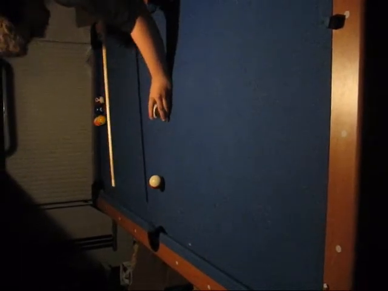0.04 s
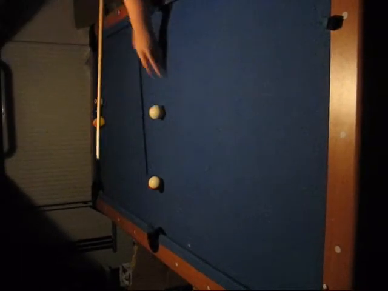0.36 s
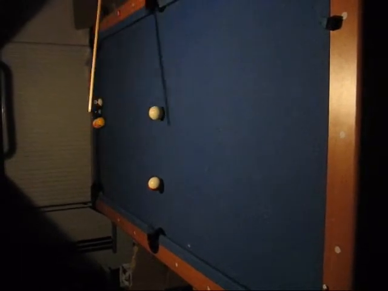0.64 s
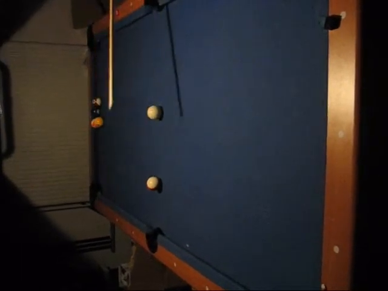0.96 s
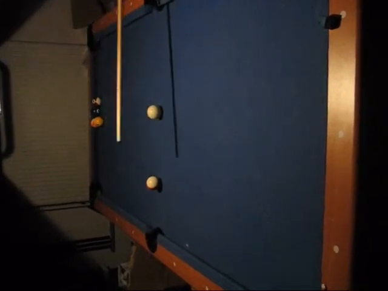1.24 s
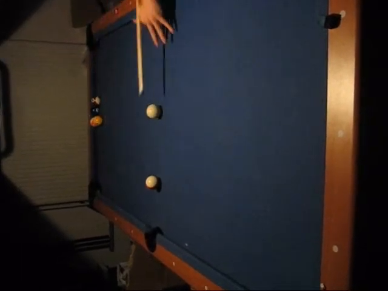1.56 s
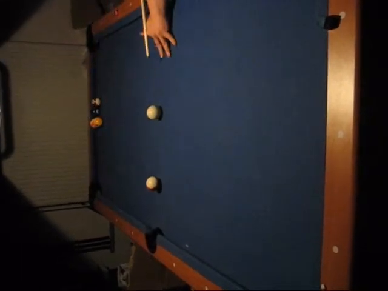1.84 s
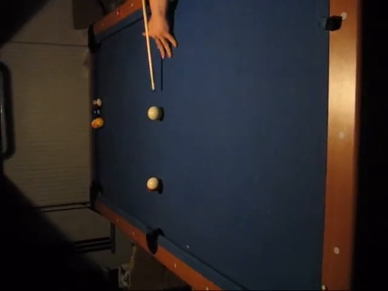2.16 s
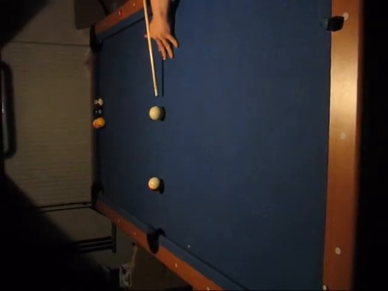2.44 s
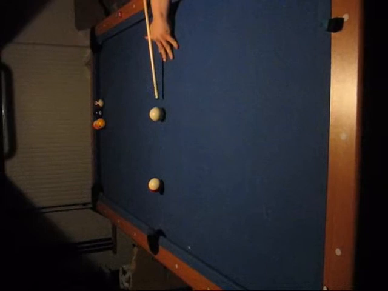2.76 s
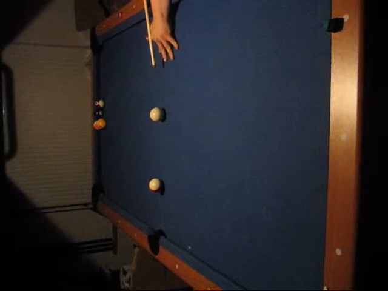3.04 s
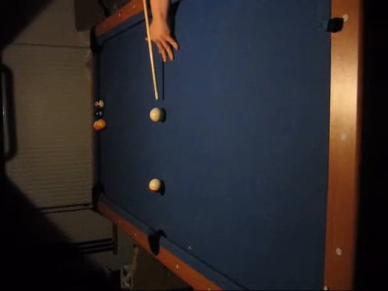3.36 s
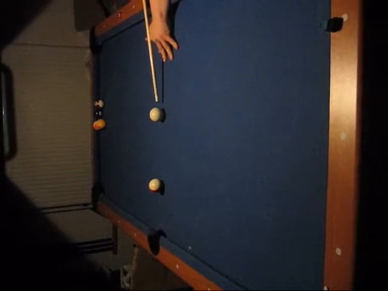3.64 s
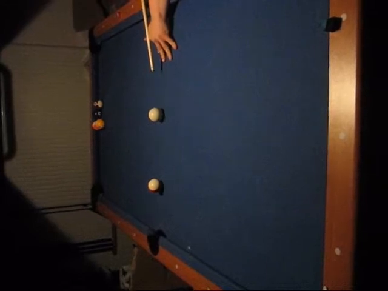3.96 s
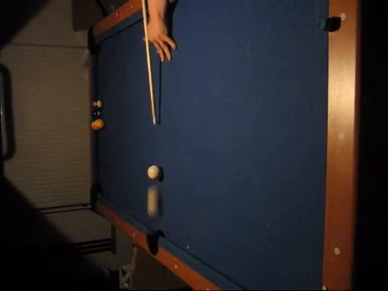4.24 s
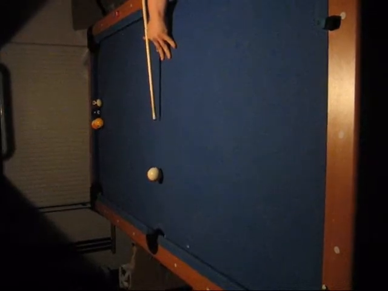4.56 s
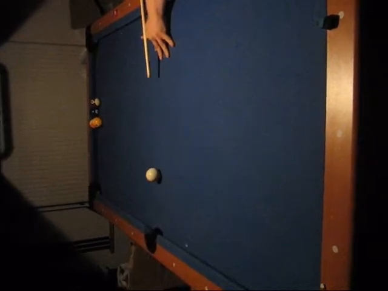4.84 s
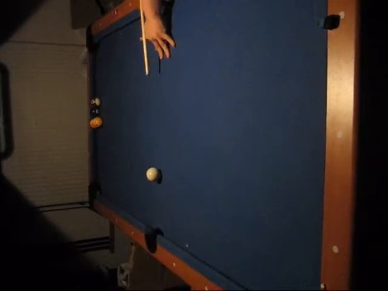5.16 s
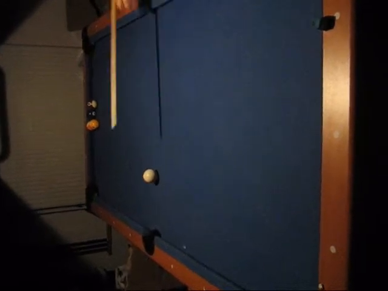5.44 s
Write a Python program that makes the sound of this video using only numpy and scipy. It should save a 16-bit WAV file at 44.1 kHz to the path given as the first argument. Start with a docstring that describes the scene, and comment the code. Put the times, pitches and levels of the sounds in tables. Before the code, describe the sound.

A pool cue taps a ball that clicks another into a pocket, where it drops and rolls away through wood, over steady hiss.

```python
"""Pool shot in a small hard room

Sleeve and cue shaft rustle, the leather tip strikes, and the cue ball clicks on a second ball,
which hits the pocket, drops into the wooden return channel and rolls away inside the table.
A small camera overhead ducks its gain at the blows and adds hiss, whine and coarse 8-bit grit."""
import sys
import numpy as np
from scipy import signal
from scipy.fft import rfft, irfft, next_fast_len
from scipy.io import wavfile
from scipy.ndimage import map_coordinates

SR = 44100
rng = np.random.default_rng(int(sys.argv[2]) if len(sys.argv) > 2 else 0)


def wav_out(sig):
    """Save sig, one row per channel (or a flat mono array), as 16-bit PCM at SR to the path in sys.argv[1]."""
    wavfile.write(sys.argv[1], SR, np.round(np.clip(np.atleast_2d(sig).T, -1, 1) * 32767).astype(np.int16))


N = 242991
TIME = np.arange(N) / SR

# the tip's double contact: start_s, level_db, corner_hz, room_db
TIP_HITS = [(4.2291, -9.5, 2430, -3), (4.2303, -9.5, 6060, -1)]
# colour of the tap: freq_hz, gain_db
TIP_COLOUR = [(40, -18.5), (120, -17.5), (230, 5.5), (500, 5), (700, -17.5), (1100, -5), (1700, -9),
              (2400, -5.5), (3200, -24), (5000, -33.5)]
# ring of the cue: pitch_hz, level_db, t60_s
CUE_RING = [(243, -11, 0.21), (297, -3, 0.04), (344, -11, 0.046), (482, -1.5, 0.14), (980, -17.5, .2),
            (1440, -30, 0.15), (2094, -12.5, 0.1), (2230, -24, 0.088)]

def cue_strike():
    """The leather tip taps the cue ball and sets the cue ringing."""
    return blows(TIP_HITS, body(TIP_COLOUR, CUE_RING, ring_db=-4), near_db=2)

# cue ball on the second ball, then that ball on the pocket's edge: start_s, level_db, corner_hz, room_db
CLICK_HITS = [(4.2996, -3.5, 3750, -3), (4.3853, -13, 7100, -12)]
# colour of a click: freq_hz, gain_db
CLICK_COLOUR = [(100, -18.5), (400, -24.5), (800, -16), (1200, -9.5), (1850, -0.5), (2800, -1),
                (3500, -8.5), (4500, -18.5), (5500, -26)]

def hard_clicks(slate_delay_s=0.0013, slate_gain=0.21):
    """The collision and the pocket-edge tick: bright pulses, each with a reflection from the slate."""
    clicks = blows(CLICK_HITS, body(CLICK_COLOUR), near_db=0)
    return clicks + slate_gain * np.interp(TIME - slate_delay_s, TIME, clicks, left=0)

# ever duller hits in the pocket: start_s, level_db, corner_hz, room_db
POCKET_HITS = [(4.3858, -11, 4960, -9.5), (4.391, -3.5, 2020, -7), (4.395, -5, 1450, -9.5),
               (4.4055, -10, 930, -11.5)]
# colour of the clunk: freq_hz, gain_db
POCKET_COLOUR = [(60, -20.5), (140, -21), (220, -3), (480, -6.5), (700, -15.5), (1400, -7), (2200, -14.5),
                 (4000, -22.5)]
# ring of the pocket: pitch_hz, level_db, t60_s
POCKET_RING = [(219, -12, 0.16), (314, 0.5, 0.12), (470, -19.5, 0.069), (902, -10, 0.062),
               (1366, -18.5, 0.069)]

def pocket_clunk():
    """The ball hits the pocket's back wall, which rings low and short."""
    return blows(POCKET_HITS, body(POCKET_COLOUR, POCKET_RING, ring_db=6), near_db=2.5)

# the drop and its bounces: start_s, thud_db, thud_corner_hz, rattle_db, gap_s, rattle_corner_hz
CHANNEL_LANDINGS = [(4.4497, -10, 520, -12, .0088, 7100), (4.7285, -22, 400, -20, .0105, 3930),
                    (4.8734, -14, 854, -18.5, .0205, 2670)]
# knocks on corners and joints: start_s, level_db, corner_hz
CHANNEL_KNOCKS = [(4.486, -11.5, 1080), (4.4904, -13, 1190), (4.4973, -13, 800), (4.5409, -20, 2200),
                  (4.5557, -18.5, 2160), (4.977, -24, 690), (4.997, -26.5, 1210), (5.048, -23.5, 1010),
                  (5.1438, -34.5, 2980), (5.205, -30, 261)]

def channel_knocks(cabinet, rattles=3, loss_db=3.5):
    """Each landing thuds, then rattles and fades between the side walls; single knocks follow."""
    knock_room_db, thud_room_db, rattle_room_db = -6.5, -2.5, -1
    hits = [(start_s, db, corner_hz, knock_room_db) for start_s, db, corner_hz in CHANNEL_KNOCKS]
    for start_s, thud_db, thud_hz, rattle_db, gap_s, rattle_hz in CHANNEL_LANDINGS:
        hits.append((start_s, thud_db, thud_hz, thud_room_db))
        for k in range(rattles):
            hits.append((start_s + (k + 1) * gap_s, rattle_db - k * loss_db, rattle_hz, rattle_room_db))
    return blows(hits, cabinet, near_db=5)  # hidden inside the table: little arrives directly

# stretches of rolling on wood: start_s, length_s, level_db
ROLL_RUNS = [(4.534, .055, -31.5), (4.742, .04, -31), (4.891, .285, -28)]

def roll_envelope(attack_s=0.028, fade_db_per_s=3, stop_db_per_s=201, creep_db=-45.5):
    """Each run builds, loses a little speed and dies; after the last the ball creeps on."""
    runs = np.zeros(N)
    for start_s, length_s, db in ROLL_RUNS:
        age = np.maximum(TIME - start_s, 0)
        loss_db = fade_db_per_s * age + stop_db_per_s * np.maximum(age - length_s, 0)
        runs += np.minimum(age / attack_s, 1) * amp(db - loss_db)
    return np.maximum(runs, amp(creep_db) * (TIME > ROLL_RUNS[-1][0]))

def rolling(cabinet, bumps_per_s=75, uneven=0.12, scatter_db=3, scrape_db=6.5, fade_db_per_s=23.5):
    """Uneven bumps and fine scraping drive the cabinet; the scrape fades as the ball runs deeper."""
    bump_count = np.cumsum(bumps_per_s * np.exp(uneven * wobble(60))) / SR
    bumps = np.diff(np.floor(bump_count), prepend=0) * amp(scatter_db * wobble(80))
    chatter = unit(softened(bumps - bumps.mean(), corner_hz=260))
    away_s = np.maximum(TIME - ROLL_RUNS[-1][0], 0)
    scrape = amp(scrape_db - fade_db_per_s * away_s) * rng.standard_normal(N)
    rumble = roll_envelope() * unit(signal.fftconvolve(chatter + scrape, cabinet)[:N])
    return signal.fftconvolve(rumble, room(room_db=-10.5, near_db=-4.5))[:N]

# colour of a tap on the wood: freq_hz, gain_db
CABINET_COLOUR = [(40, -35), (80, -22.5), (140, -11.5), (200, 1), (520, -2), (800, -3), (1100, -5),
                  (1900, -7.5), (2900, -13), (4000, -25), (5500, -24.5)]
# boom of the cabinet: pitch_hz, level_db, t60_s
CABINET_RING = [(86.2, -17.5, .24), (113, -10.5, 0.24), (192, -5, 0.17), (228, -2.5, .18),
                (320, -1.5, 0.093), (502, -3.5, .08), (668, -6.5, 0.058), (958, -6, 0.078)]

def return_channel():
    """Knocks and rolling both sound through the table's wooden cabinet."""
    cabinet = body(CABINET_COLOUR, CABINET_RING, ring_db=-5.5)
    return channel_knocks(cabinet) + rolling(cabinet)

def body(colour, modes=(), ring_db=0, size=16384):
    """An object's answer to a tap: a short minimum-phase pulse plus its ringing modes."""
    cepstrum = irfft(np.log(amp(along(colour, np.fft.rfftfreq(size, 1 / SR)))))
    cepstrum[1:size // 2] *= 2
    cepstrum[size // 2 + 1:] = 0
    pulse = irfft(np.exp(rfft(cepstrum)))
    t = np.arange(size) / SR
    ring = sum(amp(db) * decay(t, t60_s) * np.cos(2 * np.pi * hz * t) for hz, db, t60_s in modes)
    return unit(pulse) + amp(ring_db) * unit(ring)

def softened(x, corner_hz):
    """A longer, softer contact loses the treble."""
    return signal.sosfilt(signal.butter(2, corner_hz, fs=SR, output="sos"), x)

def blows(hits, response, near_db):
    """Each blow excites the object, then the room; its level is the dry energy spread over 10 ms."""
    out = np.zeros(N + 2 * SR)
    for start_s, db, corner_hz, room_db in hits:
        hit = softened(response, corner_hz)
        hit *= amp(db) * np.sqrt(SR / 100) / np.linalg.norm(hit)
        heard = signal.fftconvolve(hit, room(room_db, near_db))
        out[round(start_s * SR):][:len(heard)] += heard
    return out[:N]

# the player's movements: peak_s, rise_s, sleeve_db, shaft_db
MOVES = [(.18, 0.083, -52, -56), (.345, 0.066, -45, -45.5), (0.763, .045, -46, -42.5),
         (.96, 0.021, -67, -50.5), (1.066, 0.039, -46.5, -37), (1.285, 0.033, -57.5, -48.5),
         (1.555, .06, -41.5, -42), (1.691, 0.025, -47.5, -55), (1.8, 0.27, -54.5, -56),
         (5.335, 0.031, -43.5, -48), (5.4, 0.048, -44.5, -54.5), (5.5, .025, -41, -46.5)]
# soft rustle of the sleeve: freq_hz, density_db
SLEEVE_COLOUR = [(100, -17), (250, -3.5), (450, 0), (900, -1), (1400, -9.5), (2500, -23.5)]
# the shaft sliding through the hand: freq_hz, density_db
SHAFT_COLOUR = [(600, -28), (1000, -9), (1500, 1.5), (2600, 0), (3500, -5), (5000, -16)]

def handling(grain_db=1.57):
    """Cloth and skin catch and slip as the player lines up and later stands back."""
    speeds = np.array([stroke(peak_s, rise_s) for peak_s, rise_s, _, _ in MOVES])
    _, _, sleeve_db, shaft_db = np.transpose(MOVES)
    catch = amp(grain_db * wobble(120))
    sleeve = amp(sleeve_db) @ speeds * noise(SLEEVE_COLOUR)
    shaft = amp(shaft_db) @ speeds * noise(SHAFT_COLOUR)
    return catch * (sleeve + shaft)

# swings of the arm: peak_s, rise_s, level_db, centre_hz, glide_hz_per_s
ARM_SWINGS = [(.25, 0.11, -43, 1127, 3594), (.76, 0.032, -44.5, 995, 1500)]

def arm_brush(width_hz=480):
    """The arm brushes along: a hollow band of friction that rises in pitch through the swing."""
    out = np.zeros(N)
    for peak_s, rise_s, db, centre_hz, glide in ARM_SWINGS:
        phase = 2 * np.pi * np.cumsum(centre_hz + glide * (TIME - peak_s)) / SR
        band = wobble(2 * width_hz) * np.cos(phase) + wobble(2 * width_hz) * np.sin(phase)
        out += amp(db) * stroke(peak_s, rise_s) * unit(band)
    return out

def stroke(peak_s, rise_s, fall_ratio=1.1, roundness=1.25):
    """A movement gathers speed up to its peak and slows a little more gently."""
    offset = (TIME - peak_s) / rise_s
    distance = np.maximum(-offset, offset / fall_ratio)
    return np.exp(-np.minimum(distance, 10) ** roundness)

# reverb of the hard walls: freq_hz, t60_s
ROOM_DECAY = [(100, 0.38), (500, 0.48), (1500, .56), (4000, .45)]

def room(room_db, near_db, near_t60_s=0.06, build_s=0.0061):
    """The direct path, near scatter from table and lamp, and a fresh diffuse tail from the walls."""
    hz, frame_s, bands = signal.stft(rng.standard_normal(SR * 3 // 4), SR, nperseg=256)
    bands *= decay(frame_s, along(ROOM_DECAY, hz)[:, None])
    _, tail = signal.istft(bands, SR, nperseg=256)
    t = np.arange(len(tail)) / SR
    tail *= 1 - np.exp(-t / build_s)
    near = rng.standard_normal(len(t)) * decay(t, near_t60_s)
    early = signal.unit_impulse(len(t)) + amp(near_db) * near / np.linalg.norm(near)
    return early / np.linalg.norm(early) + amp(room_db) * tail / np.linalg.norm(tail)

# amplifier hiss: freq_hz, density_db
HISS_COLOUR = [(20, 0), (60, -0.5), (110, 0.5), (350, 2), (900, -1), (1700, -0.5), (3000, -3.5), (4000, -3),
               (5500, -6)]
# thin whine of the circuits: pitch_hz, level_db
WHINE_TONES = [(60, -66.5), (1620, -60), (3015, -58), (3085, -61), (4646, -65.5), (4704, -55.5),
               (4764, -68)]

def electronics(hiss_db=-45, drift_hz=4, flutter_db=1.5):
    """Amplifier hiss and whining tones that waver in pitch and strength."""
    whine = np.zeros(N)
    for hz, db in WHINE_TONES:
        peak = np.sqrt(2) * amp(db + flutter_db * wobble(70))
        cycles = hz * TIME + drift_hz * np.cumsum(wobble(25)) / SR
        whine += peak * np.sin(2 * np.pi * cycles)
    return amp(hiss_db) * noise(HISS_COLOUR) + whine

def gain_control(x, limit_db=-11.5, attack_s=0.0025, release_db_per_s=25):
    """The gain ducks when the smoothed level passes the limit, then creeps back."""
    pole = np.exp(-1 / (attack_s * SR))
    level_db = 10 * np.log10(signal.lfilter([1 - pole], [1, -pole], x ** 2) + 1e-12)
    excess_db = np.maximum(level_db - limit_db, 0)
    recovery_db = release_db_per_s * TIME
    return x * amp(recovery_db - np.maximum.accumulate(excess_db + recovery_db))

def amp(db):
    """Decibels to gain."""
    return 10 ** (np.asarray(db) / 20)

def unit(x):
    """Scaled to rms 1."""
    return x / np.sqrt(np.mean(x ** 2) + 1e-20)

def decay(t, t60_s):
    """A fade of 60 dB every t60_s."""
    return np.exp(-np.log(1000) * t / t60_s)

def along(points, hz):
    """A curve of (freq_hz, value) points read on a log frequency axis."""
    freqs, values = np.transpose(points)
    return np.interp(np.log(hz + 1), np.log(freqs + 1), values)

def wobble(rate):
    """A smooth random curve, rate knots a second."""
    return map_coordinates(rng.standard_normal(int(N * rate / SR) + 4), [TIME * rate])

def filtered(x, response):
    """An equaliser whose gain is a function of frequency."""
    size = next_fast_len(N + SR // 2)
    return irfft(rfft(x, size) * response(np.fft.rfftfreq(size, 1 / SR)), size)[:N]

def noise(colour):
    """Coloured noise of rms 1."""
    return unit(filtered(rng.standard_normal(N), lambda hz: amp(along(colour, hz))))

def scene():
    """The shot and the player, heard in mono from above the table."""
    shot = cue_strike() + hard_clicks() + pocket_clunk() + return_channel()
    return (shot + handling() + arm_brush())[None]

def record(dry, ceiling=0.35, step=1 / 128, hold=4, input_hz=6100, top_hz=15500):
    """Ducking, soft overload, then held 8-bit samples that mirror the sound into the treble."""
    ducked = gain_control(dry[0])
    noisy = ceiling * np.tanh(ducked / ceiling) + electronics()
    dulled = filtered(noisy, lambda hz: 1 / np.sqrt(1 + (hz / input_hz) ** 20))  # lets a little alias by
    crushed = np.round(dulled[::hold] / step) * step
    held = np.repeat(crushed, hold)[:N]
    return filtered(held, lambda hz: hz < top_hz)[None]

dry = scene()
out = record(dry)
wav_out(out)
```